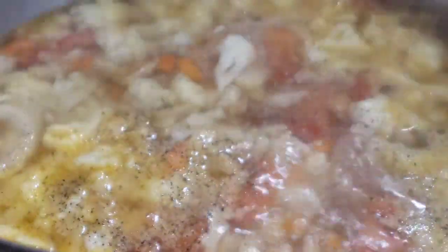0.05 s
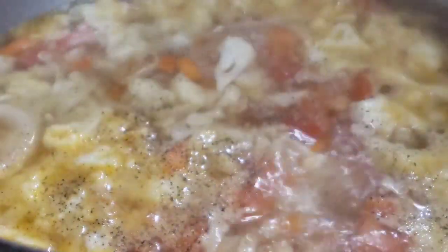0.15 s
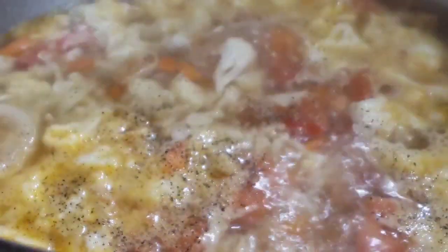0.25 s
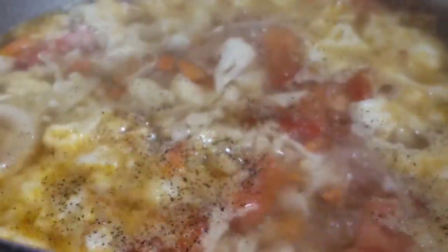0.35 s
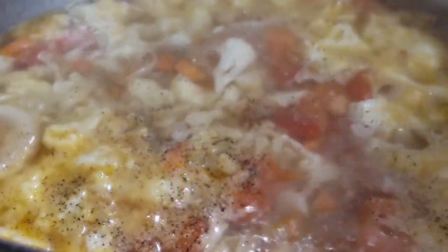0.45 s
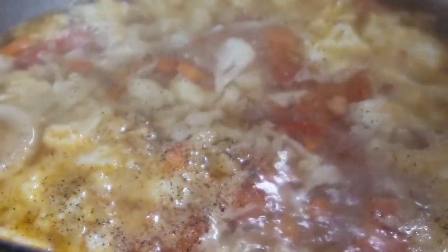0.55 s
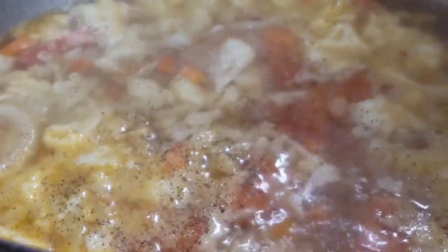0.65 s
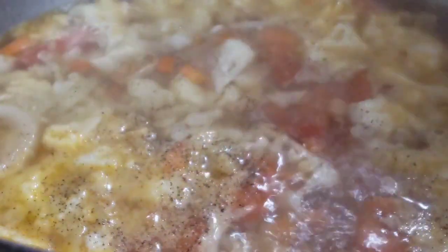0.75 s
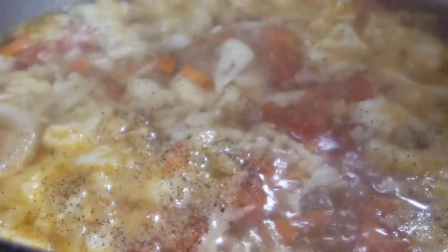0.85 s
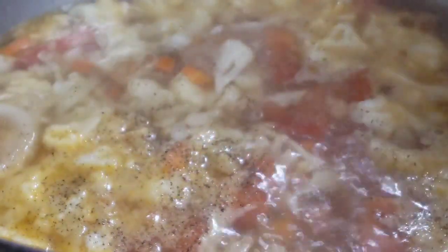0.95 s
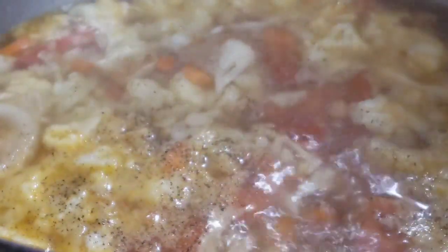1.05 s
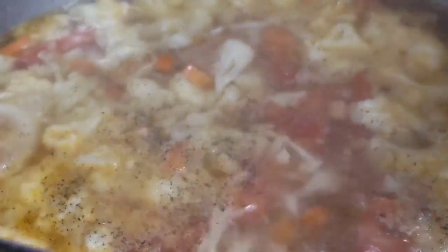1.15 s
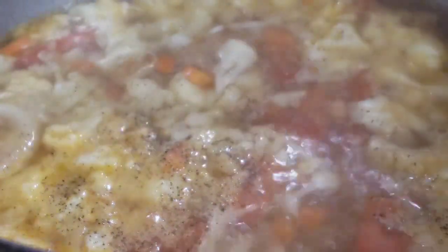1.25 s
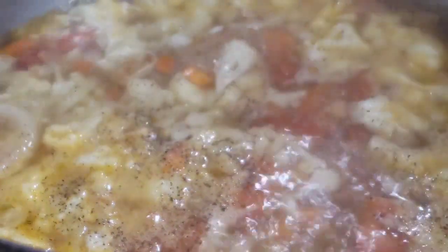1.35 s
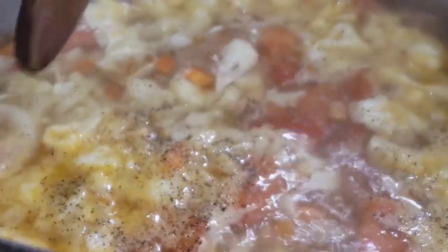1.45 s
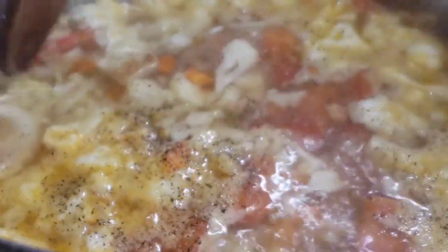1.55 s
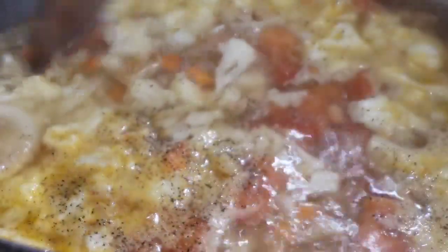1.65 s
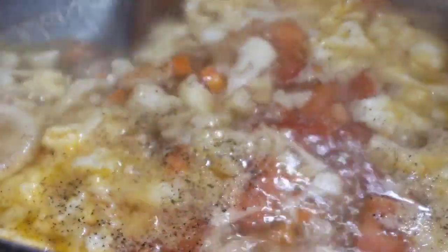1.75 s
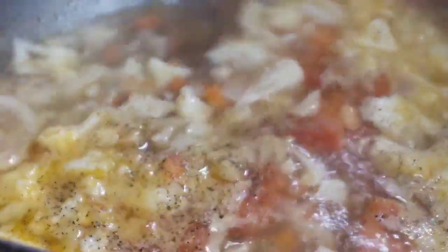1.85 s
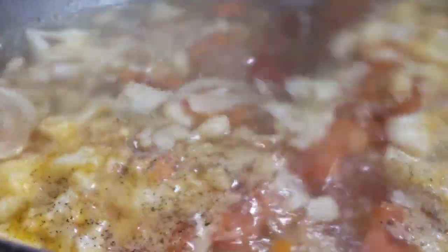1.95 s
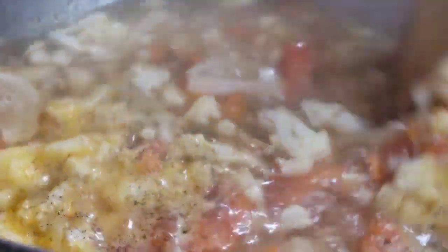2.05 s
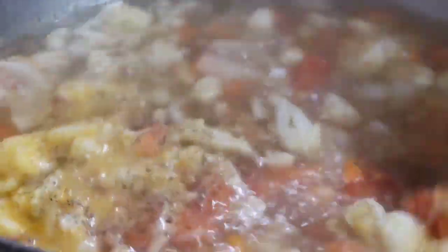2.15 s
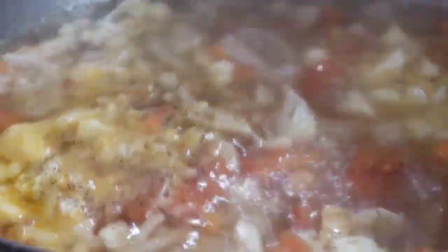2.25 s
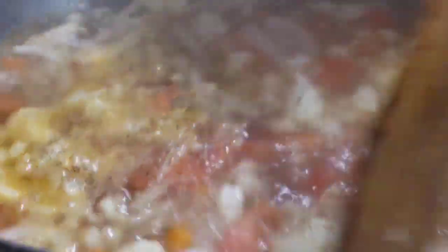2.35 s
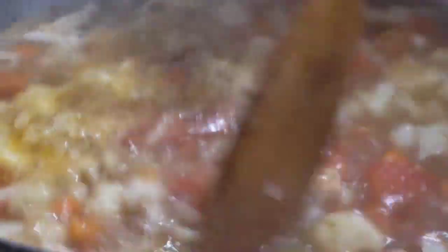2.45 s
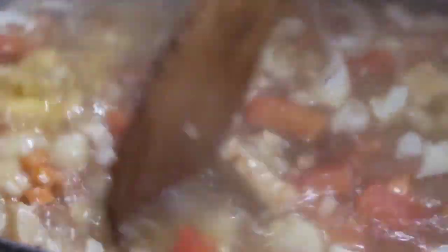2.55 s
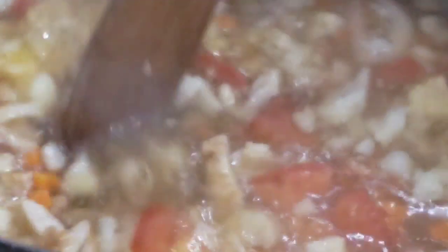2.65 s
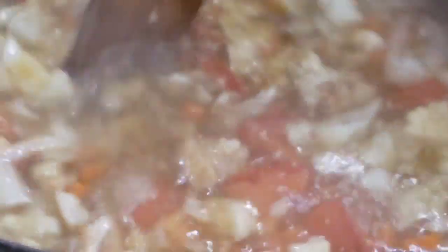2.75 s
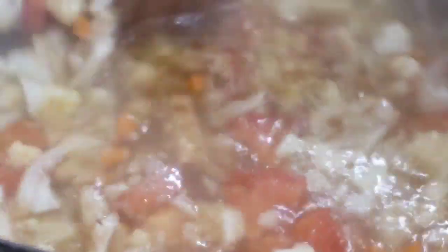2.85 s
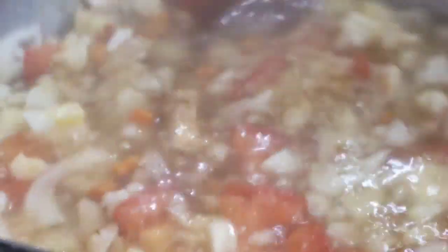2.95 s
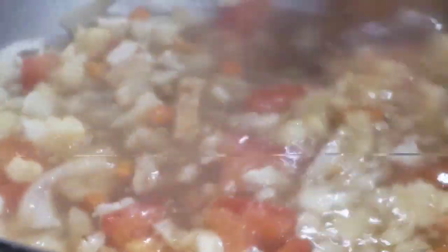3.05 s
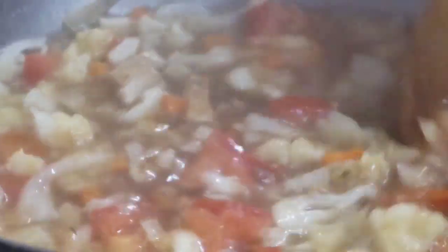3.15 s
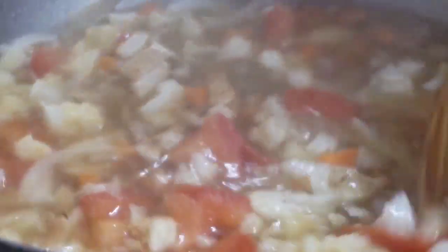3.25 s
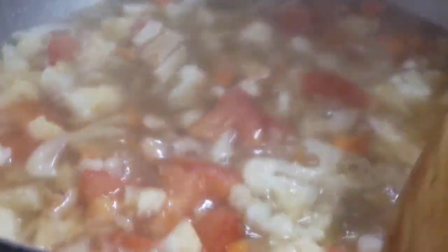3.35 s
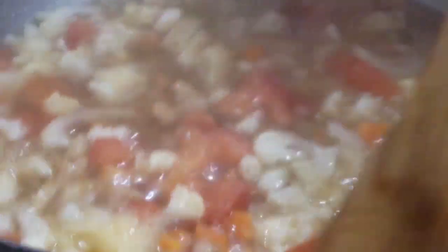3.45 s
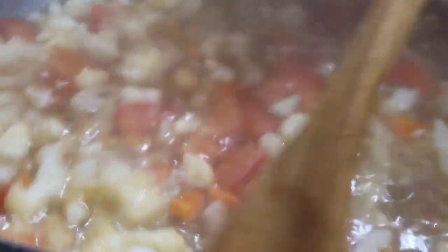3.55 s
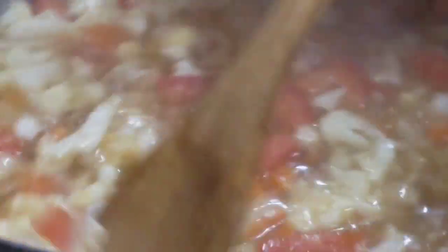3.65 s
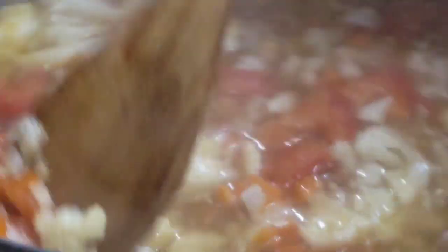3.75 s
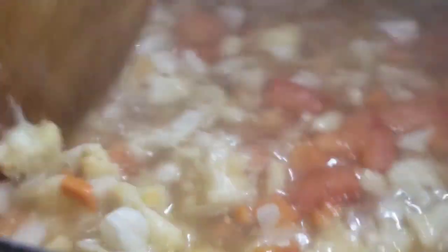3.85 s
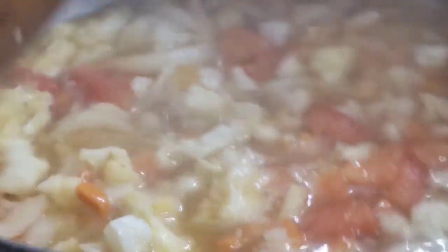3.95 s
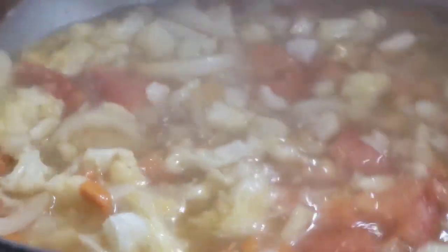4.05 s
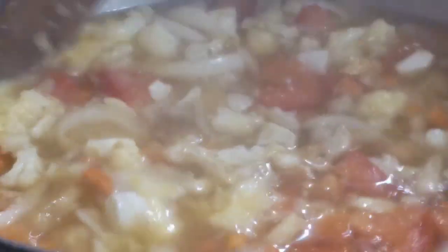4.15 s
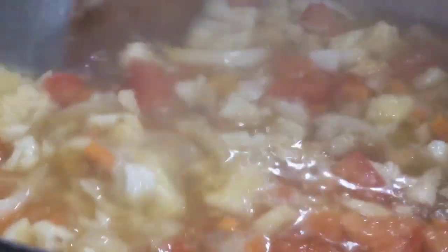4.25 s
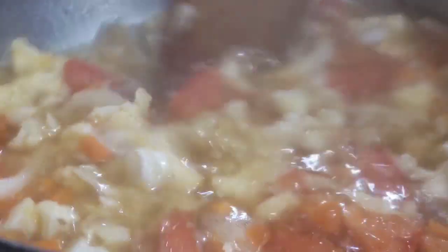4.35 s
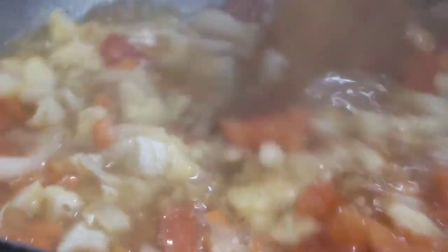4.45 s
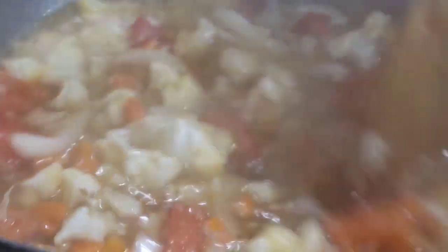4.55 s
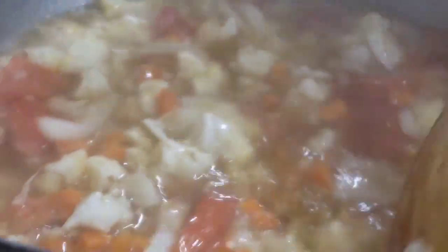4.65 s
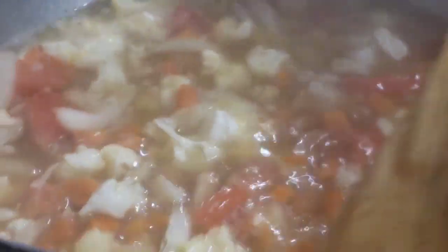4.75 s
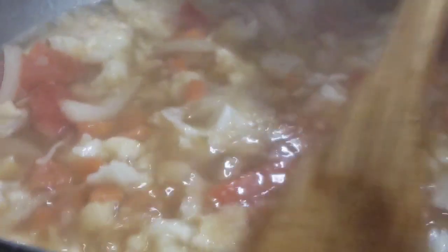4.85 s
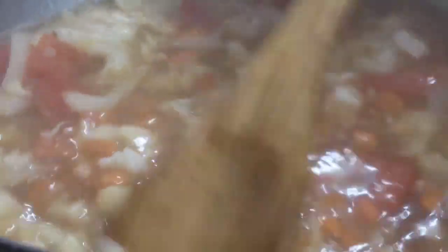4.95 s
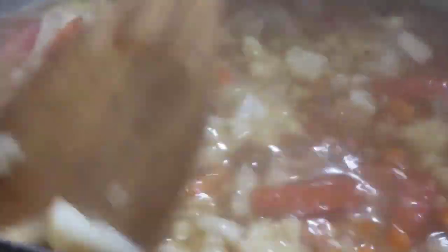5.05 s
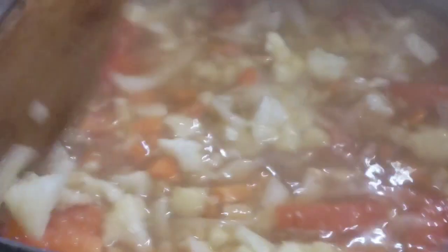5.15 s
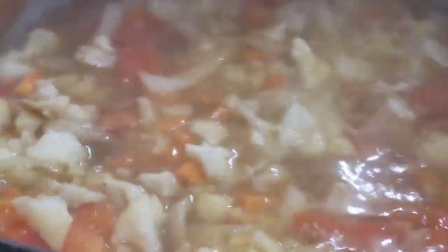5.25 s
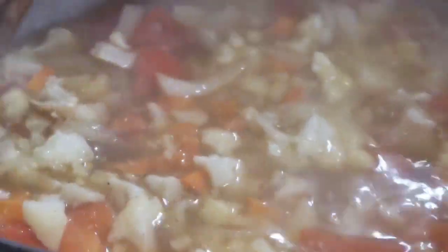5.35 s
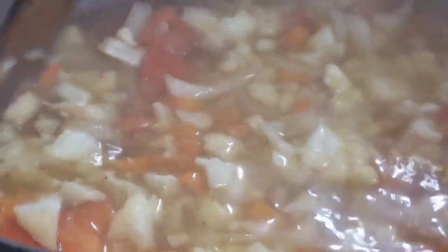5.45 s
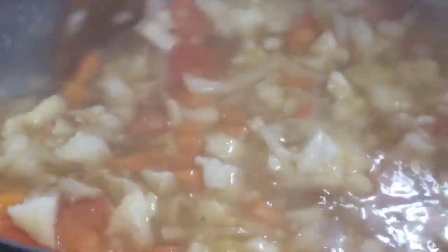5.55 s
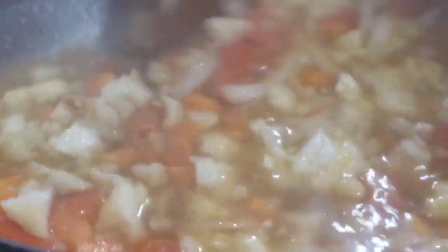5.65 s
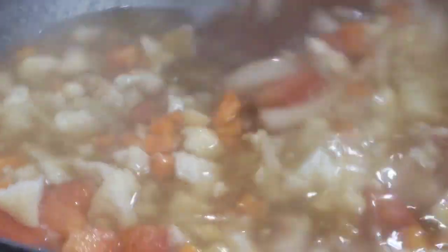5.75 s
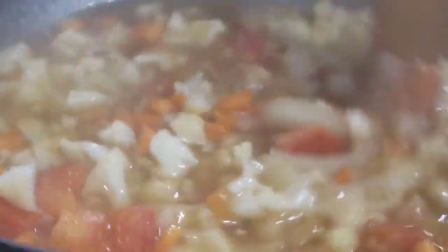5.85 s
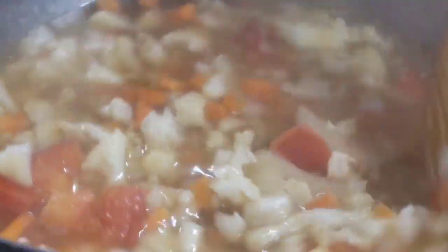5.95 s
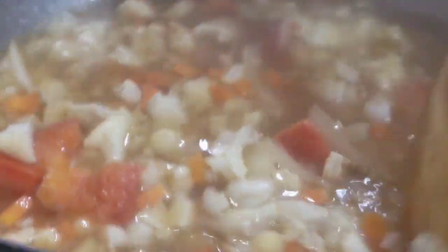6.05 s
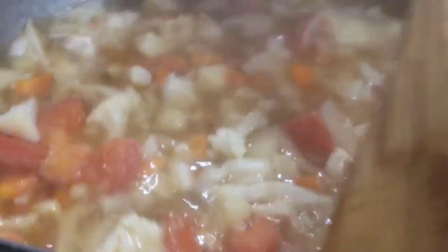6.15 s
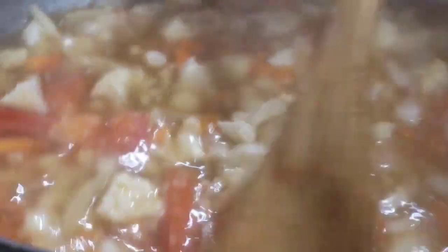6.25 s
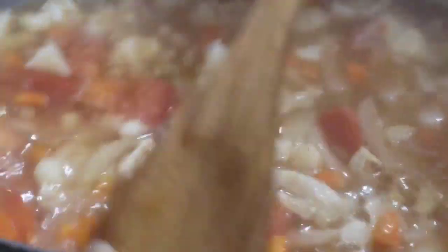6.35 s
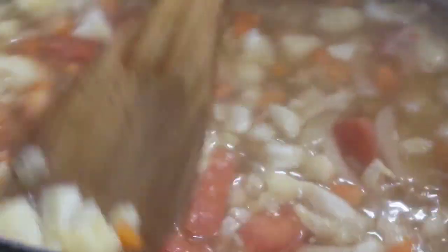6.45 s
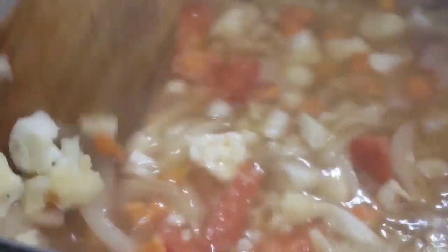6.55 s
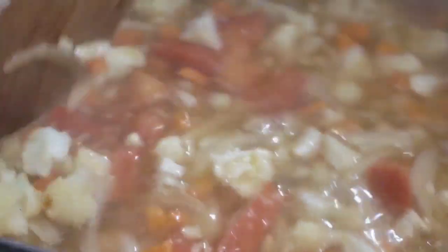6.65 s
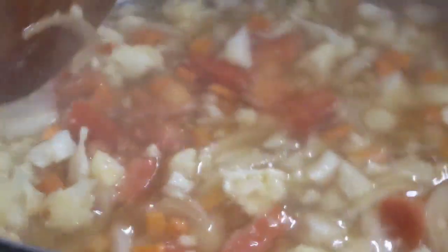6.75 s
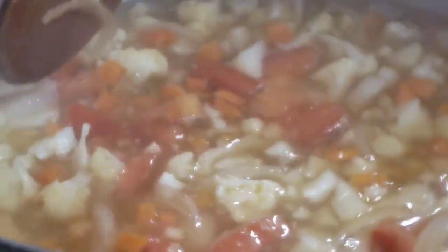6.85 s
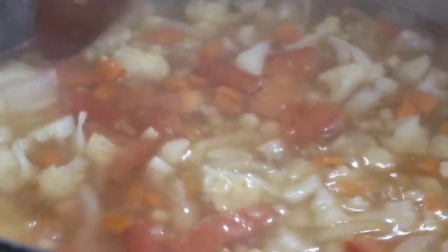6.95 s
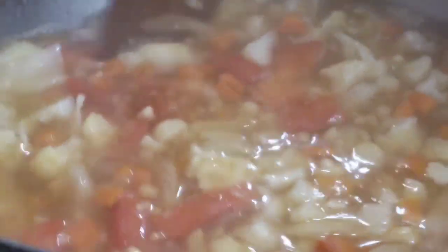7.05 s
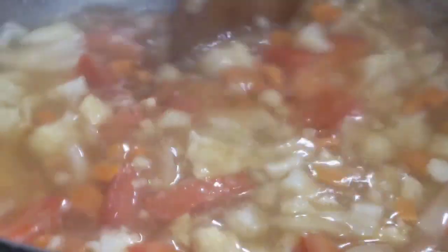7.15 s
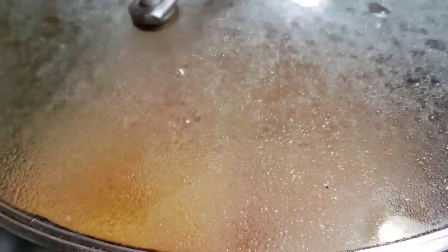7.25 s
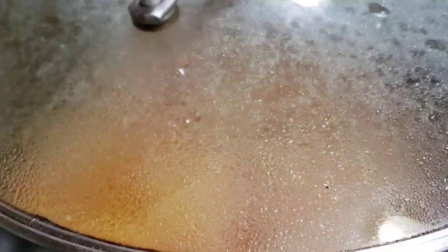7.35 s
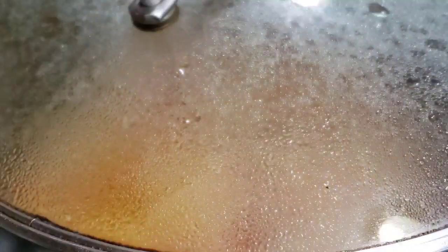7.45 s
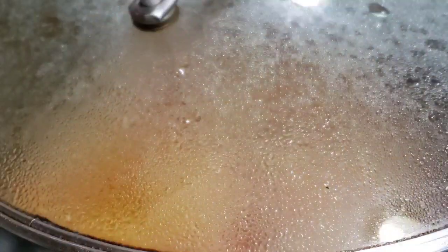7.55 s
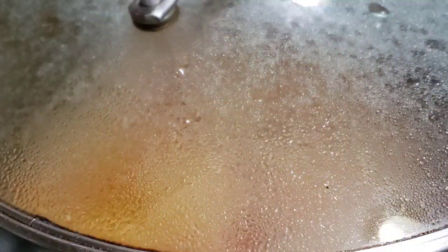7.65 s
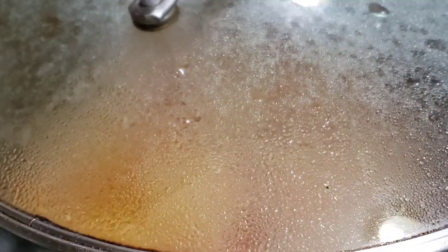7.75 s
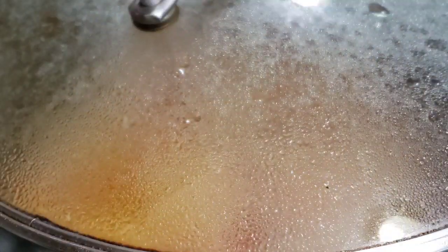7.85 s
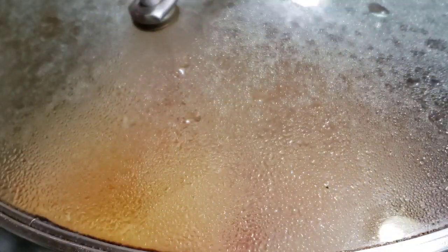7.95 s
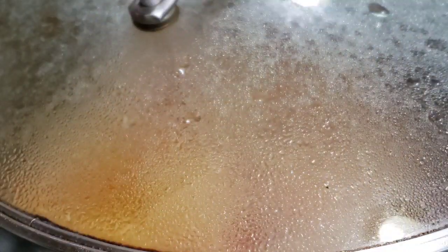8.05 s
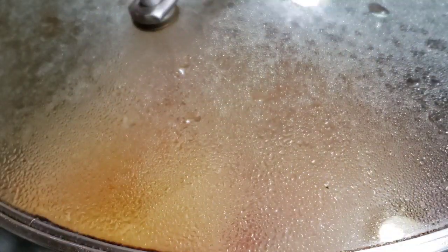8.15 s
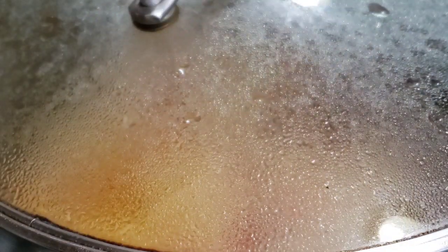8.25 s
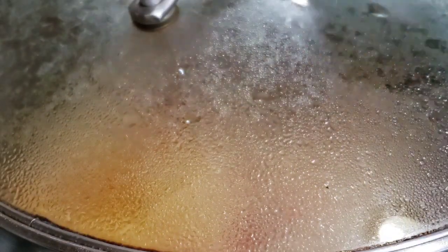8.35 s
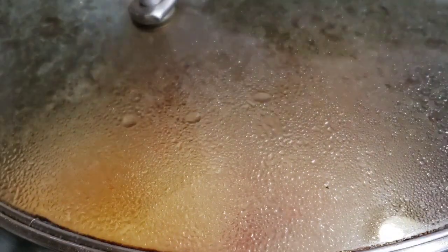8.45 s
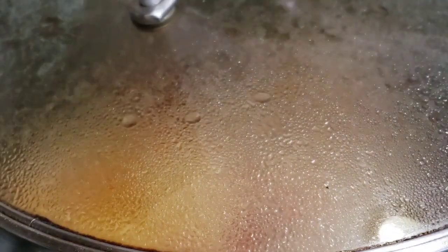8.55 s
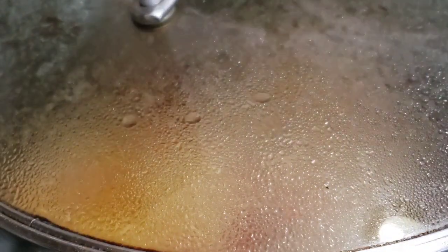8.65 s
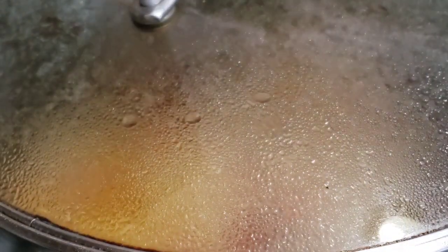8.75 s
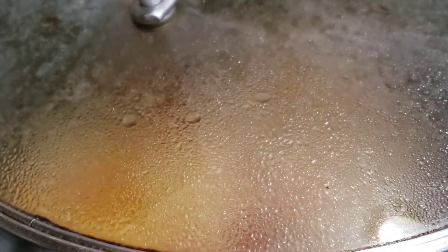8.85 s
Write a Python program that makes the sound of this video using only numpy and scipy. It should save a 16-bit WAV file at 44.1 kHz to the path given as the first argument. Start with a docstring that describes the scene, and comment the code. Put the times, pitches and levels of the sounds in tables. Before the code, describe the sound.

A pot boils low and fizzy, wood bumps and stirs it with sizzling surges, then a tiny gap and quiet, dull bubbling beneath glass.

```python
"""Vegetable soup in a metal pot

Vegetable soup simmers: a low bubbling under a fine crackling fizz, both made of noise shaped in pitch and level.
Something squeaks and thumps (wavering tones, dying rings) as a wooden spatula is picked up. Then it stirs:
it scrapes (uneven noise), knocks on the pot (ringing modes) and washes soup up the hot wall, where it
sizzles (clumps of tiny bursts). After a short silence the pot simmers on, muffled, under a glass lid.
A faint steady background hiss is louder after the lid goes on.
"""
import sys
import numpy as np
from scipy import signal
from scipy.fft import rfft, irfft, next_fast_len
from scipy.io import wavfile

SR = 44100
rng = np.random.default_rng(int(sys.argv[2]) if len(sys.argv) > 2 else 0)


def digitize_waveform(pressure):
    """Quantize a signal to 16-bit integers and store it at the path in sys.argv[1].

    Rows of a 2-D input are taken as channels; values are limited to [-1, 1].
    """
    field = np.atleast_2d(pressure).T
    bounded = np.clip(field, -1, 1)
    quanta = np.round(bounded * 32767).astype(np.int16)
    wavfile.write(sys.argv[1], SR, quanta)


N = 392926
TIME = np.arange(N) / SR

# All levels are relative: the functions below still balance the sounds. "t60" is the time to fade by 60 dB.

# Wood knocks on the pot:
# (time [s], strength [dB], contact low-pass [Hz], ring t60 at 1 kHz [s], damping of the wall's modes [dB])
KNOCKS = [(.896, -29, 1140, 0.044, 12), (0.923, -38, 1130, 0.15, 6), (1.917, -25, 1260, 0.04, 3.5),
          (2.125, -39.5, 1780, 0.041, 22), (2.643, -40, 1100, 0.022, 17), (2.79, -35, 1100, 0.026, 16),
          (3.049, -34, 960, 0.027, 7), (3.1526, -30.5, 1920, 0.067, 4), (3.582, -27.5, 1060, 0.029, 12),
          (4.2808, -29.5, 6200, 0.047, 1.5), (4.858, -35.5, 970, 0.015, 17), (5.5262, -33, 6260, 0.028, 18),
          (6.2065, -25, 920, 0.025, 5.5), (7.2981, -30.5, 805, 0.04, 11)]
# Ringing modes of the filled pot: (frequency [Hz], level [dB])
POT_MODES = [(430, -27), (530, -17), (790, -18.5), (970, -7.5), (1075, -5), (1300, -17), (1650, -36),
             (2100, 2.5), (2420, 13.5), (2870, 8.5), (3470, -0.5), (4200, -13.5), (4920, -7.5),
             (5590, -0.5), (6750, 0), (8200, 2)]
# The spatula is handled:
# (time [s], worktop ring [dB], groan [dB], groan t60 [s], clatter [dB], clatter t60 [s])
BUMPS = [(.89, -63.5, -47, 0.4, -51, 0.21), (1.258, -21.5, -34, 0.49, -33.5, 0.32),
         (1.539, -45.5, -43.5, 0.55, -46, 0.58), (1.644, -59, -43.5, 0.53, -41.5, 0.4),
         (1.742, -47.5, -69.5, 0.2, -46, .15), (1.796, -53.5, -49.5, 1, -45.5, 0.39)]
# Ringing modes of the worktop: (frequency [Hz], level [dB], t60 [s])
WORKTOP_MODES = [(67.7, -1.5, 0.22), (93.5, -10.5, 0.8), (122.8, -3.5, 0.28), (178, -7, 0.16),
                 (223, -10, 0.27), (266, -3.5, 0.12), (537, -20.5, 0.032), (805, -6.5, 0.12),
                 (1076, -15.5, 0.19), (1715, -8, 0.11)]
# Wood slips on a hard rim and squeaks: (time [s], level [dB], attack [s], t60 [s], brightness [dB per octave])
SQUEAKS = [(.836, -43, .023, 0.39, -0.5), (.956, -39, .026, 0.22, -1)]
# What a squeak rings with: (frequency [Hz], level [dB])
SQUEAK_MODES = [(692, 0.5), (1295, -12), (2020, -16), (2560, -4), (3200, -18), (4150, -22)]
# Light clinks against the rim: (time [s], level [dB])
CLINKS = [(0.967, -36), (1.416, -38), (1.798, -35.5)]
# What a clink rings with: (frequency [Hz], level [dB])
CLINK_MODES = [(2020, -5.5), (2350, 2), (2580, 3.5), (3090, -11.5), (3380, -12.5)]
# The spatula judders along the pot with a low tone: (time [s], level [dB], pitch [Hz], attack [s], t60 [s])
JUDDERS = [(1.55, -42, 208, .03, 0.64), (1.76, -44.5, 125, .05, .7)]
# The largest droplets spit on hot metal: (time [s], level [dB])
SPITS = [(0.0632, -34.5), (0.7083, -41), (1.2504, -28.5), (2.11, -35.5), (2.2323, -37.5), (2.357, -37.5),
         (4.0974, -42), (4.5066, -33), (6.473, -33), (5.2144, -50), (5.2677, -47.5), (5.778, -52),
         (6.818, -49), (6.9087, -47), (7.1726, -52.5), (7.232, -52), (7.951, -50.5)]
# Spatula strokes through the pot: (start [s], attack [s], hold [s], release t60 [s],
# rubbing [dB], groan of the pot [dB], fizz on the bared metal [dB])
STROKES = [(1.38, 0.11, 0.37, 1.3, -61, -71, -65.5), (2.42, 0.11, 0.033, 0.47, -52.5, -56, -73),
           (3.15, 0.02, 0.009, 0.31, -53.5, -60, -58.5), (4.09, .11, .005, 0.26, -55.5, -60, -66),
           (4.2, 0.32, 0.018, .64, -48, -51.5, -57), (4.958, 0.006, 0.0036, 0.56, -52.5, -64, -67.5),
           (5.38, 0.19, 0.0077, .36, -51.5, -51, -67.5), (7.1, 0.039, .01, 0.37, -65.5, -90, -90)]
# The blade's edge grates on the pot: (start [s], attack [s], hold [s], release t60 [s], level [dB])
GRATES = [(.83, 0.012, .003, 0.14, -54), (.945, 0.022, .003, 0.49, -50), (1.78, .012, 0.043, 0.18, -56),
          (4.958, 0.0077, .003, 0.36, -49.5), (5.68, 0.021, 0.25, 0.52, -75.5)]
# Soup washes up the hot wall: (start [s], attack [s], hold [s], release t60 [s], level [dB])
WAVES = [(2.53, 0.27, .07, 0.59, -49), (3.62, 0.17, 0.027, 0.67, -42), (3.96, 0.027, .005, 0.14, -54.5),
         (6.41, 0.12, 0.022, 0.57, -45.5)]
# The fizz flares up: (start [s], attack [s], hold [s], release t60 [s], level [dB])
FLARES = [(.95, 0.086, .01, 0.64, -53), (4.088, 0.005, .025, 0.16, -54), (5.257, 0.026, 0.017, 0.18, -60),
          (6.455, 0.028, .012, 0.61, -44.5)]
# The stirred soup sloshes: (start [s], attack [s], hold [s], release t60 [s], level [dB])
SLOSHES = [(1.85, 0.19, 0.2, 2.2, -62), (2.55, 0.37, 0.31, 5.6, -66.5), (4.2, 0.22, 0.018, 4.2, -63),
           (5.5, 0.24, 0.5, 1.2, -70.5), (6.6, 0.24, .05, 0.77, -76)]
# Soft deep swells in the rumble: (start [s], level [dB])
HEAVES = [(.2, -53.5), (3.14, -57), (5.04, -62), (7.8, -71)]

# Colours give each noise its balance of low and high, each as (frequency [Hz], relative level [dB]).
# Bubbles churning in the soup: (frequency [Hz], relative level [dB])
CHURN_COLOUR = [(25, -13.5), (60, -21.5), (110, -6), (240, -2.5), (420, -9), (650, -14.5), (1000, -40.5),
                (1400, -30.5), (2000, -31.5), (4000, -40), (9000, -52.5)]
# Soup sloshing at its surface: (frequency [Hz], relative level [dB])
SLOSH_COLOUR = [(200, -13), (500, 6), (620, -5), (780, 1.5), (880, -3), (1020, 4), (1250, -11),
                (2100, -23.5), (3000, -20), (8000, -34.5)]
# Rumble of the stove: (frequency [Hz], relative level [dB])
RUMBLE_COLOUR = [(20, -7.5), (45, -17), (70, 5.5), (95, -5.5), (120, -2), (150, -19), (400, -24),
                 (700, -29), (1500, -43), (16000, -60)]
# Fizz at the rim: (frequency [Hz], relative level [dB])
FIZZ_COLOUR = [(500, -39), (1500, -15.5), (2400, -11), (2900, -14), (3400, -7), (4500, -3.5), (5700, -2.5),
               (7200, -7.5), (9500, -4.5), (12500, 1.5), (16000, -0.5)]
# Faint steady background hiss: (frequency [Hz], relative level [dB])
HISS_COLOUR = [(700, -13), (1100, -9.5), (1650, -3.5), (2300, -9.5), (2900, -0.5), (3300, -9), (4700, -10),
               (5700, 3.5), (7000, -2), (9500, -4), (12500, -5.5), (16000, 5)]
# Spitting droplets: (frequency [Hz], relative level [dB])
SPIT_COLOUR = [(1000, -34), (3300, -20), (4500, -6.5), (5700, -4), (7500, -10.5), (10000, -4.5),
               (13000, -3.5), (16000, -4.5)]
# Soup on the hot wall: (frequency [Hz], relative level [dB])
SIZZLE_COLOUR = [(240, -29.5), (400, -5.5), (520, -10), (800, -8.5), (1070, -5), (1600, -4.5), (2100, -6),
                 (2400, -0.5), (2900, -9.5), (3300, -4.5), (4400, -1.5), (5700, -2.5), (7000, -7.5),
                 (14000, -2.5), (16000, -3.5)]
# Blade rubbing on the pot: (frequency [Hz], relative level [dB])
RUB_COLOUR = [(200, -2.5), (450, -7), (750, 5.5), (1100, 2.5), (1500, 2), (2100, -1.5), (2600, -1.5),
              (3200, -4), (4200, -7), (5600, -6.5), (7200, -14.5), (15000, -40)]
# Blade edge grating: (frequency [Hz], relative level [dB])
GRATE_COLOUR = [(800, -14.5), (1900, -2), (2400, -3.5), (3200, 2), (4400, -4), (6000, -9.5), (7500, -19),
                (15000, -49.5)]
# Groaning pot: (frequency [Hz], relative level [dB])
GROAN_COLOUR = [(50, -31.5), (120, -4.5), (210, 0), (300, -9.5), (500, -16), (1000, -40)]
# Clattering wood: (frequency [Hz], relative level [dB])
CLATTER_COLOUR = [(200, -3), (560, 3), (780, -0.5), (900, -2), (1030, -1), (1450, -5), (1680, -7),
                  (1900, -5.5), (2800, -12.5), (3800, -17.5), (9000, -54.5)]
# How alike diffuse noise is on the left and right: (frequency [Hz], likeness from 0 to 1)
LIKENESS = [(60, 1), (130, 0.91), (290, 0.91), (640, 0.56), (1400, 0), (3000, 0.1), (16000, 0)]

# The boil at full heat: bubbles in the soup, its surface, the fizz at the rim, the stove's rumble
CHURN_DB, SLOSH_DB, FIZZ_DB, RUMBLE_DB = -61.0, -71.5, -58.5, -69
# Stirring cools the pot: the fizz sinks steadily, the bubbling drops in one step
FIZZ_COOLS_FROM_S, FIZZ_COOLS_TO_S, FIZZ_COOLING_DB = 2.58, 5.9, 22.2
CHURN_DROP_S, CHURN_DROP_DB = 5.01, 4.4
FIZZ_RECOVERS_S, FIZZ_RECOVERY_DB_PER_S = 5.5, 1.5   # the wall heats up again
HEAVE_ATTACK_S, HEAVE_HOLD_S, HEAVE_T60_S = 0.049, 0.014, 1
LID_ON_S, LID_MUFFLE_HZ = 7.41, 550
LID_CHURN_LOSS_DB, LID_SLOSH_LOSS_DB, LID_FIZZ_LOSS_DB, LID_RUMBLE_LOSS_DB = 6.2, 10.5, 0.5, 1.5
HISS_DB, HISS_WAVER_DB, HISS_WAVERS_PER_S = -74, 1.9, 5.5
OPEN_HISS_LOSS_DB = 5   # the background hiss is fainter before the lid goes on
SPIT_T60_S = 0.029
CLINK_ATTACK_S, CLINK_T60_S = .003, .075
ATTACK_CURVE = 2.22   # above 1, a swell eases in
PITCH_WANDER = 0.0252   # share of the pitch, at 1 kHz
WALL_LOWEST_HZ, WALL_HIGHEST_HZ = 2000, 3600   # the pot modes that belong to its wall
POT_ROUND_TRIP_S = .0019   # across the pot and back
LEFT_LEAD_S = 0.0002
SILENCE_FROM_S, SILENCE_TO_S = 7.387, 7.436
CUTOFF_HZ = 15900


def from_db(db):
    """Turns decibels into a gain."""
    return 10 ** (np.asarray(db) / 20)


def rms_one(x):
    """Scales a signal to an average (rms) strength of 1."""
    return x / np.sqrt(np.mean(x ** 2) + 1e-20)


def at_hz(points, hz):
    """Reads a table at any frequency, with straight lines between its points on a log frequency scale."""
    points = np.array(points)
    return np.interp(np.log(hz + 1), np.log(points[:, 0]), points[:, 1])


def fade(t, t60):
    """Exponential decay that starts at t = 0."""
    return (t >= 0) * np.exp(-np.log(1000) * np.clip(t / t60, 0, 10))


def drift(rate, size=N):
    """Random wandering with spread 1, through `rate` chance points a second."""
    knots = rng.standard_normal(int(size / SR * rate) + 2)
    return rms_one(np.interp(TIME[:size] * rate, np.arange(len(knots)), knots))


def low_pass(x, hz, order=2):
    """Dulls a sound above the given frequency."""
    return signal.sosfilt(signal.butter(order, min(hz, SR / 2 - 1), fs=SR, output="sos"), x)


def colour(x, spectrum, size=4096):
    """Filters with the given spectrum, without sounding ahead of time (minimum phase); rms 1."""
    gain = from_db(at_hz(spectrum, np.fft.rfftfreq(size, 1 / SR)))
    cepstrum = irfft(np.log(gain))
    cepstrum[1:size // 2] *= 2
    cepstrum[size // 2 + 1:] = 0
    response = irfft(np.exp(rfft(cepstrum)))
    return rms_one(signal.oaconvolve(x, response[None], axes=1)[:, :N])


def diffuse(size=N):
    """Stereo noise from all sides: alike in the bass, unrelated in the treble."""
    padded = next_fast_len(size, True)
    mid, side = rfft(rng.standard_normal((2, padded)))
    alike = np.clip(at_hz(LIKENESS, np.fft.rfftfreq(padded, 1 / SR)), -1, 1)
    shared = np.sqrt((1 + alike) / 2) * mid
    opposed = np.sqrt((1 - alike) / 2) * side * [[1], [-1]]
    return irfft(shared + opposed, padded)[:, :size]


def from_left(x):
    """A direct sound from the left reaches the right channel a little later."""
    t = TIME[:len(x)]
    return np.array([x, np.interp(t - LEFT_LEAD_S, t, x, left=0)])


def echoes(x, t60, wet_db):
    """Adds a dense tail of reflections."""
    tail = diffuse(size=SR // 2) * fade(TIME[:SR // 2], t60)
    tail /= np.sqrt(np.sum(tail ** 2) / 2)
    return x + from_db(wet_db) * signal.oaconvolve(np.broadcast_to(x, (2, N)), tail, axes=1)[:, :N]


def pot_air(x, feedback):
    """Sound bounces three times between the pot's walls and takes on a hollow colour."""
    lag = int(POT_ROUND_TRIP_S * SR)
    out, bounce = x.copy(), x
    for _ in range(3):
        delayed = np.pad(bounce, ((0, 0), (lag, 0)))[:, :N]
        bounce = feedback * low_pass(delayed, 4500, order=1)
        out += bounce
    return out


def pulses(rows):
    """Loudness curve of sudden rises that die away within half a second; rows are (time s, dB, t60 s)."""
    out = np.zeros(N + SR)
    for s, db, t60 in rows:
        at = int(s * SR)
        out[at:at + SR // 2] += from_db(db) * fade(TIME[:SR // 2], t60)
    return out[:N]


def swells(rows, axis=4):
    """Sums attack-hold-release curves of up to 2 s; rows begin (start, attack, hold, t60), axis picks the dB."""
    out, t = np.zeros(N + 2 * SR), TIME[:2 * SR]
    for row in rows:
        start, attack, hold, t60 = row[:4]
        at = int(start * SR)
        rise = np.sin(np.pi / 2 * np.minimum(t / attack, 1)) ** ATTACK_CURVE
        release = fade(np.maximum(t - attack - hold, 0), t60)
        out[at:at + len(t)] += from_db(row[axis]) * rise * release
    return out[:N]


def together(*gains):
    """Unrelated sounds add in power."""
    return np.sqrt(sum(gain ** 2 for gain in gains))


def under_lid(loss_db):
    """Gain that steps down when the lid goes on."""
    return np.where(TIME < LID_ON_S, 1, from_db(-loss_db))


def crackle(per_s, spread_db, clump_db, t60):
    """Tiny bursts come in clumps, each with its own size, delay to the right channel and brief rattle."""
    chance = per_s * from_db(clump_db * drift(45)) / SR
    at = np.flatnonzero(rng.random(N) < chance)
    sizes = from_db(spread_db * np.minimum(rng.exponential(1, N), 5))[at]
    sizes *= rng.choice([-1, 1], N)[at]
    right_delay = rng.integers(-12, 16, N)[at]   # in samples; below 0 the right comes first
    clicks = np.zeros((2, N))
    clicks[0, at] = sizes
    clicks[1, np.clip(at + right_delay, 0, N - 1)] = sizes
    # each click leaves energy that falls by 60 dB in t60
    energy = signal.lfilter([1], [1, -from_db(-120 / (t60 * SR))], clicks[0] ** 2 + 1e-18)
    rattle = np.sqrt(energy) * rng.standard_normal((2, N))
    return rms_one(0.88 * rms_one(clicks) + rms_one(rattle))


def slip_tones(rows):
    """Tones swell and die, the higher ones wandering more; rows are (time s, dB, Hz, attack s, t60 s)."""
    out, t = np.zeros(N), TIME[:SR // 2]
    for s, db, hz, attack, t60 in rows:
        wander = PITCH_WANDER * np.sqrt(hz / 1000) * drift(900, size=len(t))
        tone = np.sqrt(2) * np.sin(2 * np.pi * np.cumsum(hz * (1 + wander)) / SR)
        envelope = np.minimum(t / attack, 1) * fade(np.maximum(t - attack, 0), t60)
        at = int(s * SR)
        out[at:at + len(t)] += from_db(db) * tone * envelope
    return out


def simmer():
    """Bubbles churn and the surface sloshes, quieter under the lid; the stove rumbles below."""
    vigour = from_db(-CHURN_DROP_DB * (TIME > CHURN_DROP_S))
    churn = colour(diffuse() * from_db(2.0 * drift(35)), CHURN_COLOUR)
    churn = np.where(TIME < LID_ON_S, churn, low_pass(churn, LID_MUFFLE_HZ))
    churn *= from_db(CHURN_DB) * vigour * under_lid(LID_CHURN_LOSS_DB)

    slosh = colour(diffuse() * from_db(2.25 * drift(70)), SLOSH_COLOUR)
    slosh *= together(from_db(SLOSH_DB) * vigour, swells(SLOSHES)) * under_lid(LID_SLOSH_LOSS_DB)

    rumble = colour(diffuse(), RUMBLE_COLOUR) * from_db([[1.5], [-1.5]])   # stronger on the left
    heaves = swells([(s, HEAVE_ATTACK_S, HEAVE_HOLD_S, HEAVE_T60_S, db) for s, db in HEAVES])
    rumble *= together(from_db(RUMBLE_DB) * under_lid(LID_RUMBLE_LOSS_DB), heaves)
    return churn + slosh + rumble


def fizz():
    """Fine bursts follow the wall's heat and droplets spit, over a faint hiss, louder after the lid goes on."""
    is_open = TIME < LID_ON_S
    cooled_db = np.interp(TIME, [FIZZ_COOLS_FROM_S, FIZZ_COOLS_TO_S], [0, FIZZ_COOLING_DB])
    reheated_db = FIZZ_RECOVERY_DB_PER_S * np.maximum(TIME - FIZZ_RECOVERS_S, 0)
    # under the lid a fixed loss takes the place of the reheating
    heat_db = FIZZ_DB - cooled_db + np.where(is_open, reheated_db, -LID_FIZZ_LOSS_DB)

    grains = crackle(per_s=1300, spread_db=4.5, clump_db=3.5, t60=0.024)
    noise = diffuse()
    bed = colour(0.86 * grains + 0.46 * noise, FIZZ_COLOUR)
    bed *= together(from_db(heat_db), swells(FLARES), swells(STROKES, axis=6))

    hiss_db = HISS_DB - OPEN_HISS_LOSS_DB * is_open + HISS_WAVER_DB * drift(HISS_WAVERS_PER_S)
    hiss = colour(noise + 0.23 * grains, HISS_COLOUR) * from_db(hiss_db)

    spits = pulses([(s, db, SPIT_T60_S) for s, db in SPITS])
    spits = spits * colour(rng.standard_normal((2, N)), SPIT_COLOUR)
    return from_db(4.5) * (bed + hiss) + from_db(-4.5) * spits


def sizzle():
    """A wave of soup flashes to steam on the hot wall, in sputtering clumps."""
    grains = crackle(per_s=3000, spread_db=2.5, clump_db=5.5, t60=0.0084)
    steam = 0.39 * from_left(rng.standard_normal(N)) + 0.28 * rng.standard_normal((2, N))
    return from_db(6) * swells(WAVES) * colour(grains + steam, SIZZLE_COLOUR)


def bumps():
    """Heavy, dull contacts: the worktop rings, the pot groans, the wood clatters."""
    s, ring_db, groan_db, groan_t60, clatter_db, clatter_t60 = np.transpose(BUMPS)
    blows, ring, t = np.zeros(N), 0, TIME[:SR // 2]
    blows[(s * SR).astype(int)] = from_db(ring_db)
    for k, (hz, db, t60) in enumerate(WORKTOP_MODES):
        sign = (-1) ** k
        ring = ring + sign * from_db(db) * np.sin(2 * np.pi * hz * t) * fade(t, t60)
    thud = from_left(signal.oaconvolve(blows, ring)[:N])
    groan = low_pass(pulses(zip(s, groan_db, groan_t60)), 200) * colour(diffuse(), GROAN_COLOUR)
    clatter = pulses(zip(s, clatter_db, clatter_t60)) * colour(diffuse(), CLATTER_COLOUR)
    return thud + groan + clatter


def squeaks():
    """The spatula sticks and slips: squeaks and clinks on the rim, a low judder along the pot."""
    lowest_hz = SQUEAK_MODES[0][0]
    squeak = [(s, db + mode_db + tilt_db * np.log2(hz / lowest_hz), hz, attack, t60)
              for s, db, attack, t60, tilt_db in SQUEAKS for hz, mode_db in SQUEAK_MODES]
    clink = [(s, db + mode_db, hz, CLINK_ATTACK_S, CLINK_T60_S)
             for s, db in CLINKS for hz, mode_db in CLINK_MODES]
    return from_left(slip_tones(squeak + clink + JUDDERS))


def knocks():
    """Each knock rings the pot's modes and scatters inside it; soup between wood and metal dulls the contact."""
    out, t = np.zeros((2, N)), TIME[:SR // 4]
    hz, mode_db = np.transpose(POT_MODES)[:, :, None]
    ring_share = np.minimum(hz / 1000, 1000 / hz) ** .3   # modes far from 1 kHz die sooner
    no_bass = signal.butter(2, 330, "high", fs=SR, output="sos")   # the soup damps the deep modes
    scatter = colour(diffuse(), RUB_COLOUR) + colour(diffuse(), GRATE_COLOUR)
    of_wall = (hz > WALL_LOWEST_HZ) & (hz < WALL_HIGHEST_HZ)
    # every knock excites each mode a little differently
    chance = rng.standard_normal((len(KNOCKS), 3, len(POT_MODES), 1))
    for (s, db, contact_hz, t60, damping_db), (strength_db, detune, phase) in zip(KNOCKS, chance):
        mode_gain = from_db(mode_db + strength_db - damping_db * of_wall)
        mode_hz = hz * (1 + .012 * detune)
        modes = mode_gain * np.cos(2 * np.pi * mode_hz * t + phase * hz / 4000)
        ring = np.sum(modes * fade(t, t60 * ring_share), axis=0)
        direct = from_left(low_pass(ring, contact_hz, order=3))

        span = slice(int(s * SR), int(s * SR) + len(t))
        tail = low_pass(scatter[:, span], 1.11 * contact_hz, order=4)
        tail = tail * (0.079 * fade(t, t60) + 0.2 * fade(t, 4 * t60))
        out[:, span] += from_db(db) * signal.sosfilt(no_bass, direct + tail)
    return out


def stirring():
    """The blade rubs in uneven slips, grates on its edge and makes the pot groan when it bears down."""
    slips = (diffuse() + 0.26 * from_left(rng.standard_normal(N))) * from_db(0.42 * drift(160))
    rub = colour(slips, RUB_COLOUR) * swells(STROKES)
    grate = colour(diffuse(), GRATE_COLOUR) * swells(GRATES)
    groan = colour(diffuse(), GROAN_COLOUR) * swells(STROKES, axis=5)
    return pot_air(rub + grate, feedback=0.28) + groan


def scene():
    """The pot stands a little to the left, in a small kitchen; rim and hob reflect its sounds closely."""
    spatula = echoes(knocks() + squeaks() + bumps(), t60=.28, wet_db=-15)
    pot = pot_air(fizz(), feedback=0.45) + pot_air(sizzle(), feedback=0.3561) + stirring()
    pot = echoes(pot, t60=0.057, wet_db=-8.5)
    # left and right gains in dB
    soup = simmer() * from_db([[.5], [-.5]])
    return soup + pot * from_db([[1.6], [-1.6]]) + spatula * from_db([[1.3], [-1.3]])


def record(dry):
    """The sound drops out for a moment, with softened edges; the highest treble is cut."""
    sounding = (TIME < SILENCE_FROM_S) | (TIME > SILENCE_TO_S)
    live = low_pass(sounding.astype(float), 300)
    treble_cut = signal.ellip(12, .1, 80, CUTOFF_HZ, fs=SR, output="sos")
    return signal.sosfilt(treble_cut, dry * live)


dry = scene()
out = record(dry)
digitize_waveform(out)
```